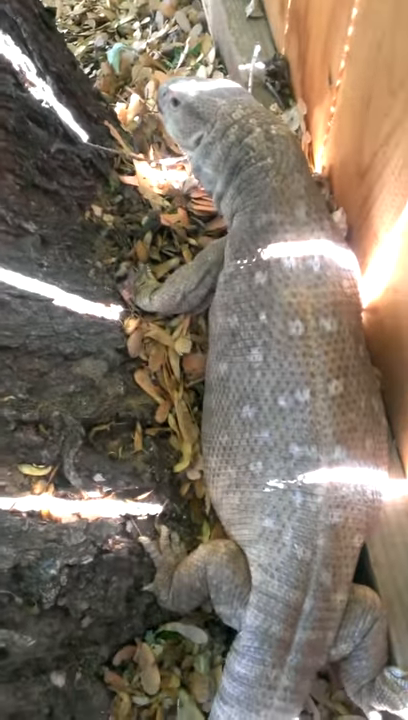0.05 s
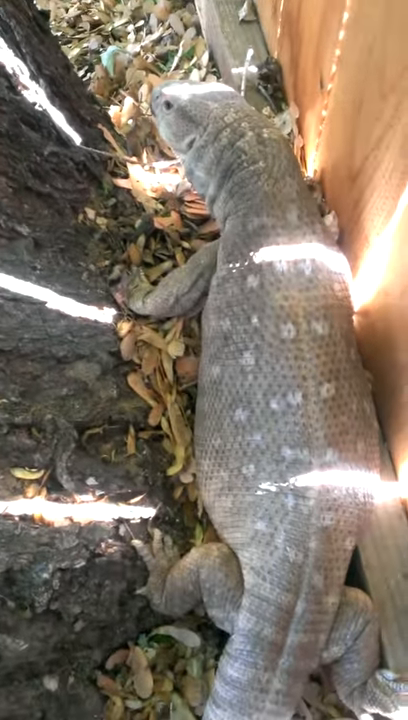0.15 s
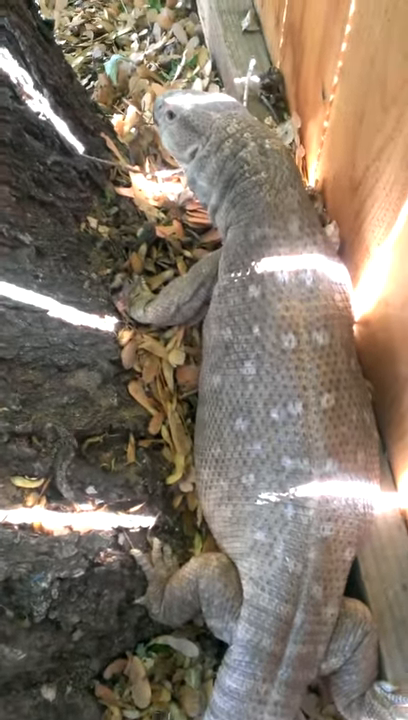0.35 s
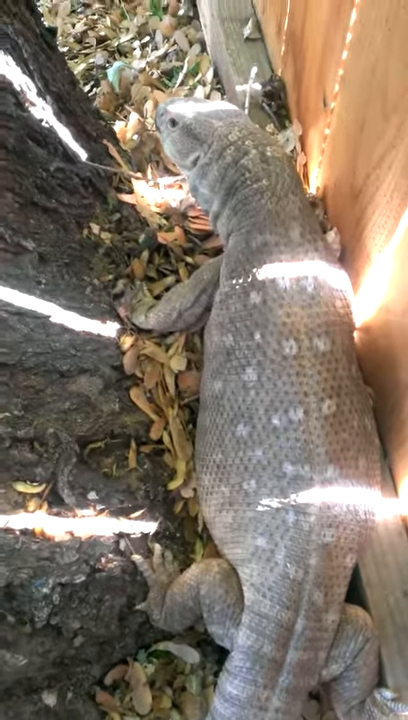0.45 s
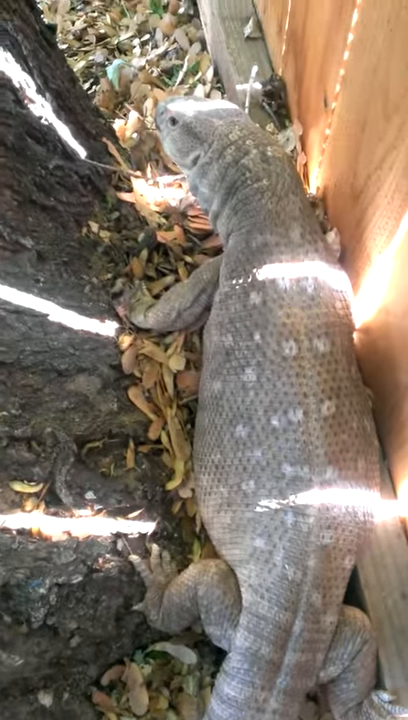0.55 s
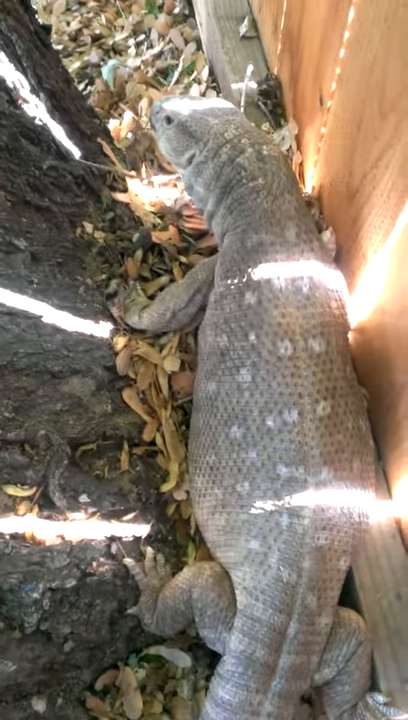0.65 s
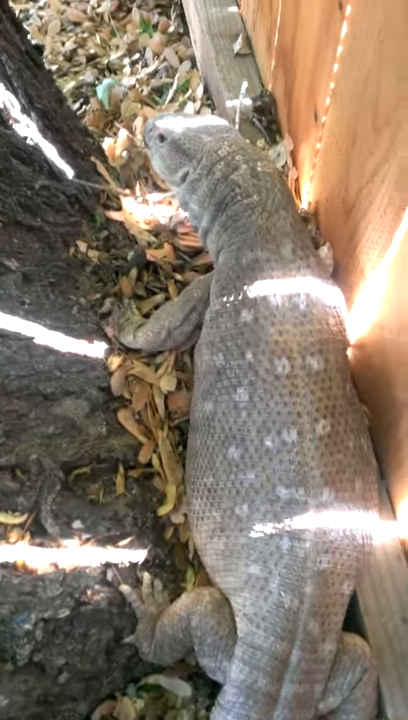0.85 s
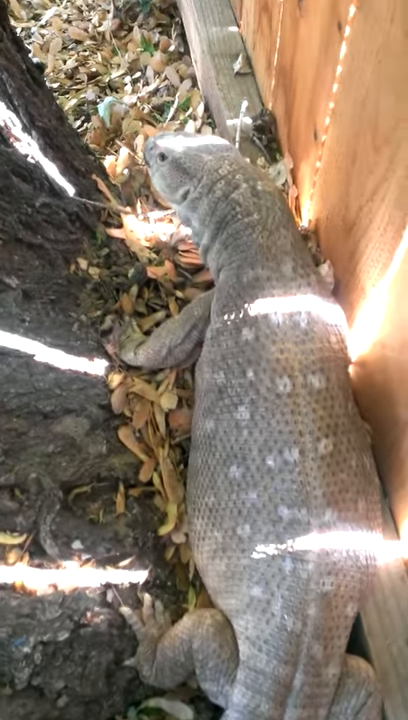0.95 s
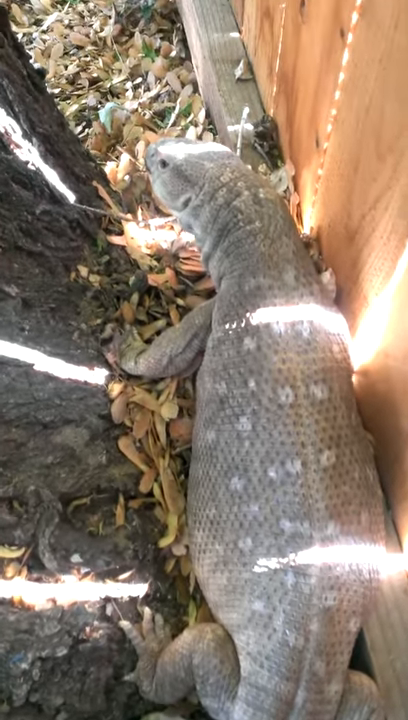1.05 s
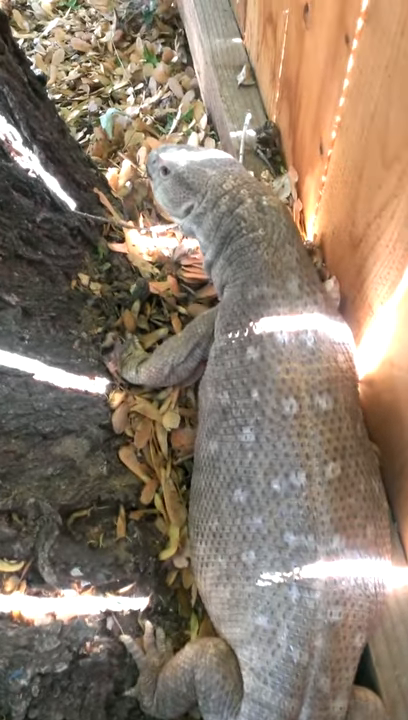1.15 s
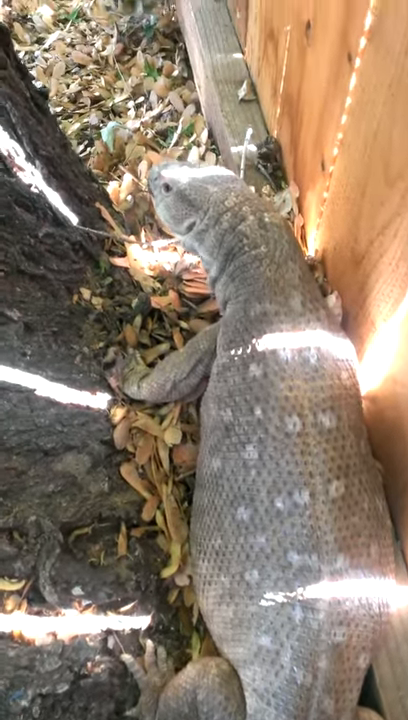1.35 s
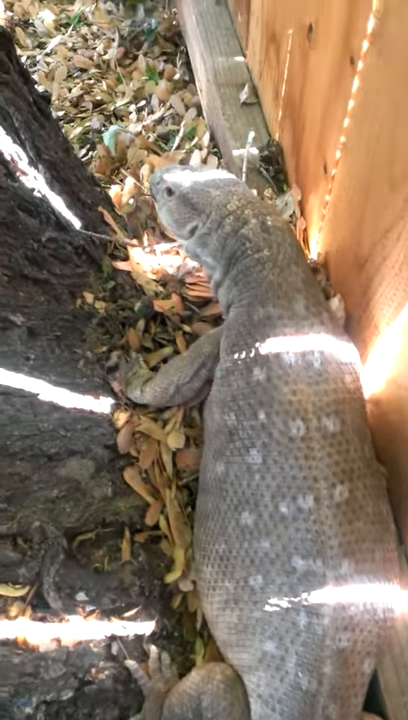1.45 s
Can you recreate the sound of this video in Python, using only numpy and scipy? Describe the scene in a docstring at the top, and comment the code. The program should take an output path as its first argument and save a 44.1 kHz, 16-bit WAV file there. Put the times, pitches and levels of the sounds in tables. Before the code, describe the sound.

A soft, dry hiss, probably a hand rubbing beside the microphone, runs from the start over a quiet yard's low rumble and faint, distant machine hum. A finger bumps the microphone on the left at about 0.25 seconds. Thin, high squeaks come on the right around 0.65 and 1.1 seconds, with a falling swish between them near 0.85. The hiss eases off after 1.3 seconds.

```python
"""A quiet fenced yard, heard from the two microphones of a hand-held camera.
From the start, a low rumble and the faint hum of a distant machine lie behind a soft, dry, close hiss,
probably the hand rubbing beside the microphone openings. Early on, a finger bumps the left microphone.
Then the right opening gives thin, high squeaks in two short bursts, with a sinking swish between them.
Near the end the hiss eases off."""
import sys
import numpy as np
from scipy import signal
from scipy.fft import rfft, irfft
from scipy.io import wavfile

SR = 44100
rng = np.random.default_rng(int(sys.argv[2]) if len(sys.argv) > 2 else 0)


def wav_record(signal):
    """Record a signal, one row per channel, as 16-bit PCM in the file named by sys.argv[1]."""
    frames = np.transpose(np.atleast_2d(signal))
    bounded = np.clip(frames, -1, 1)
    # unit amplitude maps onto the largest positive 16-bit level
    quanta = np.round(bounded * 32767).astype(np.int16)
    wavfile.write(sys.argv[1], SR, quanta)


N = 66150
T, HZ = np.arange(N) / SR, np.fft.rfftfreq(N, 1 / SR)


def amp(db):
    """Decibels to gain."""
    return 10 ** (np.asarray(db) / 20)


def unit_rms(x):
    """Scales to rms 1."""
    return x / np.sqrt(np.mean(x ** 2) + 1e-30)


def over_hz(table):
    """Every column of a table, read along log frequency."""
    hz, *columns = np.transpose(table)
    return np.array([np.interp(np.log(HZ + 1), np.log(hz + 1), c) for c in columns])


def over_time(table):
    """Every column of a table, read along time."""
    time_s, *columns = np.transpose(table)
    return np.array([np.interp(T, time_s, c) for c in columns])


def swell(peak_s, half_s):
    """A smooth rise and fall around one moment."""
    return np.exp(-((T - peak_s) / half_s) ** 2)


def wander(span_s):
    """Random drift of rms 1 that changes over about span_s."""
    return unit_rms(irfft(rfft(rng.standard_normal(N)) * np.exp(-(HZ * span_s) ** 2), N))


def noise_spectra(densities, coherence, right_lead_s=0):
    """Spectra of partly shared noise at the left and right microphones."""
    left, other = rfft(rng.standard_normal((2, N)))
    right = coherence * left + np.sqrt(1 - coherence ** 2) * other
    right *= np.exp(2j * np.pi * HZ * right_lead_s)
    return np.array([left, right]) * amp(over_hz(densities)) * np.sqrt(SR / 2)


def tone_phase(hz):
    """Phase of a tone that follows hz, from a random start."""
    return 2 * np.pi * (np.cumsum(hz * np.ones(N)) / SR + rng.random())


def noise_band(centre_hz, width_hz):
    """Noise in a resonance that may move, different at each microphone."""
    phase, span_s = tone_phase(centre_hz), 2 / width_hz
    sides = [wander(span_s) * np.cos(phase) + wander(span_s) * np.sin(phase) for side in "LR"]
    return np.array([unit_rms(side) for side in sides])


def yard_air():
    """Steady air all around the microphones, with a rumble that swells beneath it."""
    # spectrum of the still air: frequency_hz, left_db_per_hz, right_db_per_hz
    air_spectrum = [(20, -88.5, -101), (45, -95, -102), (69.6, -86.5, -92), (94, -74, -76),
                    (133, -77.5, -75), (185, -80.5, -80.5), (220, -86, -84), (316, -90.5, -85.5),
                    (416, -88.5, -88.5), (652, -98, -95.5), (965, -100, -96), (1510, -99, -101),
                    (2140, -101, -102), (3600, -102, -105), (5700, -111, -109), (7900, -117, -115),
                    (10400, -123, -121)]
    # likeness of the two sides: frequency_hz, coherence (-1..1)
    air_coherence = [(60, -0.62), (120, -.7), (260, -0.67), (540, -0.32), (1100, 0.2), (2300, 0.14),
                     (4800, 0.1)]
    # swells of the rumble: time_s, gain_db
    rumble_gain = [(0, -1), (.12, 2.5), (.2, 0.5), (.4, 0.5), (.56, 2), (.66, -1.5), (.73, 3), (.8, -2),
                   (1.06, 0.5), (1.19, -3.5), (1.28, 2), (1.4, -4), (1.5, -1.5)]
    air = noise_spectra(air_spectrum, over_hz(air_coherence)[0])
    low_share = 1 / (1 + (HZ / 500) ** 4)  # crossover at 500 Hz
    rumble = irfft(air * low_share, N) * amp(over_time(rumble_gain))
    return irfft(air * (1 - low_share), N) + rumble


def distant_machine():
    """Harmonics of a far-off motor and one fan tone, each wavering a little."""
    # the motor's harmonics: multiple of motor_hz
    orders = [4, 5, 20, 23, 24, 25, 28, 42, 45, 56, 61, 71]
    # each harmonic at the microphones: left_db, right_db, right_lag_rad
    harmonics = [(-67, -64, 2.6), (-77, -70.5, 2.6), (-97, -81, .3), (-83, -84.5, 0.34), (-80, -75, 0.19),
                 (-77, -76, 0.26), (-88, -86.5, 0.27), (-76.5, -89.5, 0.31), (-82, -86.5, .4),
                 (-84, -89, .4), (-81.5, -85, 0.51), (-83, -90, 0.44)]
    motor_hz, motor_waver_hz = 59.0, 1.06
    fan_hz, fan_waver_hz, fan_db = 462.3, 3.3, [[-71], [-76]]
    hum = amp(fan_db) * np.sin([tone_phase(fan_hz + fan_waver_hz * wander(0.057)) for side in "LR"])
    for order, (left_db, right_db, lag_rad) in zip(orders, harmonics):
        phase = tone_phase(order * motor_hz + motor_waver_hz * wander(0.11))
        hum += [amp(left_db) * np.sin(phase), amp(right_db) * np.sin(phase - lag_rad)]
    return np.sqrt(2) * hum


def rubbing():
    """Grainy friction right beside the openings: a resonant hiss and a finer fizz with brief catches."""
    # spectrum of the hiss: frequency_hz, left_db_per_hz, right_db_per_hz
    hiss_spectrum = [(600, -115, -115), (1670, -104, -109), (2350, -98.5, -107), (2520, -91.5, -98.5),
                     (2700, -90.5, -98.5), (3010, -94, -100.5), (3360, -89.5, -96.5), (3570, -87, -100.5),
                     (3980, -97.5, -103), (4400, -97, -101), (4860, -97.5, -99), (5430, -108, -108),
                     (6860, -118, -116), (10100, -130, -124)]
    # course of the hiss: time_s, gain_db
    hiss_gain = [(0, -0.5), (.04, -0.5), (.075, 2), (.15, -.5), (.24, 1.5), (.34, 0), (.42, -.5), (.52, -3),
                 (.62, -2), (.72, -2), (.9, 0), (.97, -2), (1.06, 1), (1.14, 2), (1.28, 1.5), (1.33, -3),
                 (1.4, -10.5), (1.47, -10), (1.5, -5)]
    # spectrum of the fizz, mostly on the right: frequency_hz, left_db_per_hz, right_db_per_hz
    fizz_spectrum = [(3000, -130, -120), (5300, -118, -110), (7000, -119, -105.5), (8160, -124, -104),
                     (8800, -127, -102), (9420, -130, -106), (10100, -132, -108)]
    # course of the fizz: time_s, gain_db
    fizz_gain = [(0, 3), (.13, 1), (.21, -0.5), (.27, -5), (.4, -2), (.505, -5), (.522, 8.5), (.56, 1.5),
                 (.6, -2), (.68, 2), (.77, -2.5), (.94, -4.5), (1.02, -2.5), (1.08, 4.5), (1.17, -1),
                 (1.3, -3.5), (1.42, -14.5), (1.5, -13)]
    # catches of the skin that lift the fizz: peak_s, boost_db
    catches = [(.122, 5.2), (.802, 8.3)]
    hiss = irfft(noise_spectra(hiss_spectrum, coherence=0.5, right_lead_s=.0004), N)
    hiss *= amp(over_time(hiss_gain))
    catches_db = sum(boost_db * swell(peak_s, half_s=0.0045) for peak_s, boost_db in catches)
    fizz = irfft(noise_spectra(fizz_spectrum, coherence=0), N)
    fizz *= amp(over_time(fizz_gain) + catches_db)
    grain_db = wander(span_s=.004)
    return (hiss + fizz) * amp(grain_db)


def swish():
    """One brushing stroke that sinks in pitch, stronger at the left microphone."""
    # path of the stroke: time_s, centre_hz, level_db (before side_gain)
    stroke = [(.78, 4390, -83), (.815, 4434, -62), (.855, 4450, -57), (.9, 3980, -60), (.935, 3830, -73),
              (.97, 3550, -86)]
    # balance, a row each for left and right: gain_db
    side_gain = [
        [-1],
        [-5.5],
    ]
    centre_hz, level_db = over_time(stroke)
    return noise_band(centre_hz, width_hz=780) * amp(level_db) * amp(side_gain)


def scuffs():
    """Faint scuffs, each a brief swell of band noise."""
    # the scuffs: peak_s, half_length_s, centre_hz, width_hz, left_db, right_db
    touches = [(.072, .018, 3700, 350, -58, -68), (1.286, .016, 940, 130, -71, -63),
               (1.277, .007, 3000, 1200, -59, -64)]
    return sum(noise_band(centre_hz, width_hz) * swell(peak_s, half_s) * amp([[left_db], [right_db]])
               for peak_s, half_s, centre_hz, width_hz, left_db, right_db in touches)


def squeaks():
    """The right opening whistles at one pitch in short spurts, each with a weak tail."""
    # spurts of the whistle: peak_s, half_length_s, level_db
    spurts = [(.639, .006, -56), (0.65, 0.0075, -59), (0.678, 0.011, -68), (0.715, 0.017, -66),
              (.866, .005, -67.5), (1.091, 0.0096, -48.5), (1.116, 0.0044, -60), (1.136, .006, -65),
              (1.162, .01, -68)]
    pitch_hz, waver_hz = 8806, 22.2
    tail_db, tail_s = -17.5, 0.028
    envelope = np.zeros(N)
    for peak_s, half_s, level_db in spurts:
        tail = amp(tail_db) * (T > peak_s) * np.exp(-abs(T - peak_s) / tail_s)
        envelope += amp(level_db) * np.maximum(swell(peak_s, half_s), tail)
    return np.sqrt(2) * envelope * np.sin(tone_phase(pitch_hz + waver_hz * wander(.006)))


def finger_bump():
    """One pressure jolt; the microphone's bass cut makes it swing a few times, ever slower."""
    start_s, gain_db, top_hz = .2403, -14.5, 1080
    first_swing_s, decay_s, decay_curve = .00083, .0105, 1.3
    age_s = np.maximum(T - start_s, 0)
    swings = -np.sin(np.pi * np.sqrt(age_s / first_swing_s))
    jolt = swings * np.exp(-(age_s / decay_s) ** decay_curve)
    return amp(gain_db) * signal.lfilter(*signal.butter(3, top_hz, fs=SR), jolt)


def scene():
    """Yard and rubbing at both microphones, the bump at the left, the squeaks at the right."""
    both_sides = yard_air() + distant_machine() + rubbing() + swish() + scuffs()
    return both_sides + np.array([finger_bump(), squeaks()])


def record(dry):
    """The camera cuts the top treble steeply."""
    edge_hz = 10540
    low_pass = signal.firwin(1023, edge_hz, window=("kaiser", 8), fs=SR)
    return signal.oaconvolve(dry, low_pass[None], "same")


dry = scene()
out = record(dry)
wav_record(out)
```